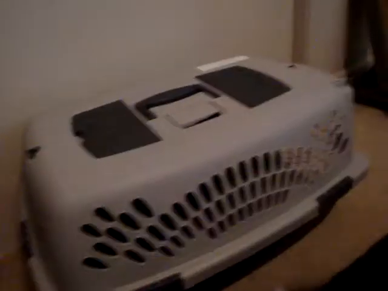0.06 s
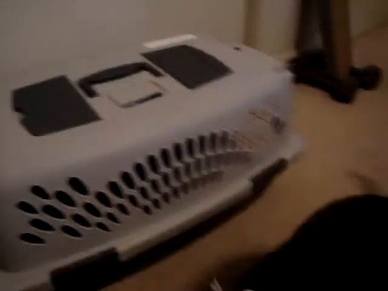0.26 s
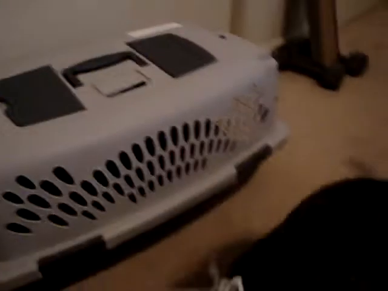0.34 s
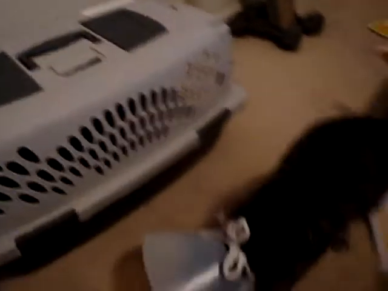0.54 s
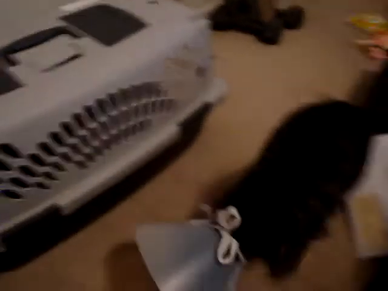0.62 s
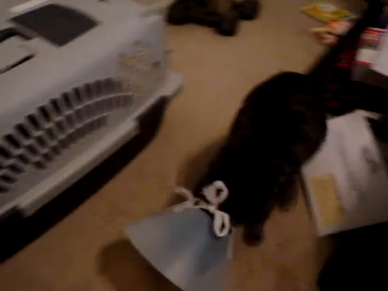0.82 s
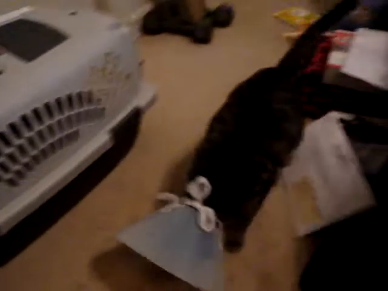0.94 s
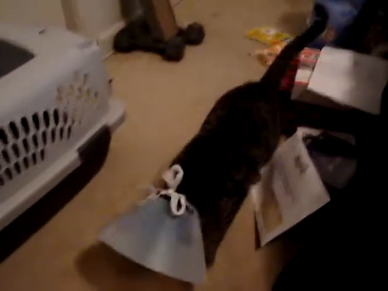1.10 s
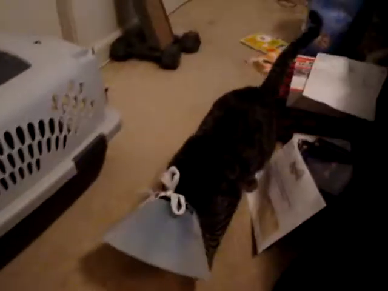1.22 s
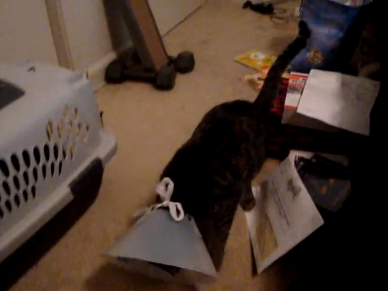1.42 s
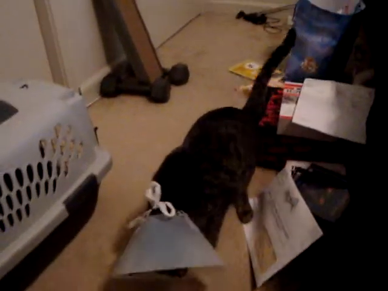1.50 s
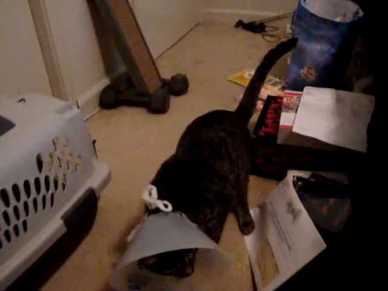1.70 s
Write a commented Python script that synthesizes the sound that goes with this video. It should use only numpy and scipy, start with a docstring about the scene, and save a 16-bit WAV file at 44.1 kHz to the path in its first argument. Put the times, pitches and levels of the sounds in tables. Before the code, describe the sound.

A cat's plastic cone catches and snaps free with one sharp, clattering knock. Soft bumps and scrapes follow, then crisp ticks of paper and a light hollow tap, heard nearby in a quiet room with a faint hum.

```python
"""A cat in a plastic cone walks out of its carrier across the carpet of a quiet room.
A quarter second in, the cone catches and snaps free with one sharp, clattering knock.
Dull bumps of cone and paws follow, with light taps and scrapes. Around one second the cat
brushes past paper in crisp ticks, the rim taps something hollow, and a last soft scrape fades.
Under it all lie the hush of the room and a faint steady hum."""
import sys
import numpy as np
from scipy import signal
from scipy.io import wavfile
from scipy.ndimage import uniform_filter1d

SR = 44100
rng = np.random.default_rng(int(sys.argv[2]) if len(sys.argv) > 2 else 0)


def wav_record(signal):
    """Record a signal, one row per channel, as 16-bit PCM in the file named by sys.argv[1]."""
    frames = np.transpose(np.atleast_2d(signal))
    bounded = np.clip(frames, -1, 1)
    # unit amplitude maps onto the largest positive 16-bit level
    quanta = np.round(bounded * 32767).astype(np.int16)
    wavfile.write(sys.argv[1], SR, quanta)


N = 77175


def snap(ring_db, crack_db, thump_db, thump_hz=278):
    """Stiff plastic catches and snaps free: a bright crack, the ring of the cone and a low push."""
    # The crack's EQ curve. Each row: frequency in Hz, gain in dB.
    crack_eq = [(200, -13), (1000, 0), (3000, -4), (3600, -5), (4800, -1), (6200, -9), (7100, -4),
                (7600, 7), (8200, -7), (8600, 0), (9200, -4), (10000, 3)]
    t = np.arange(6000) / SR
    crack = colour(burst(t, t60=.0095, grit_db=-5), lambda hz: amp(curve(crack_eq, hz)))
    thump = np.sin(2 * np.pi * thump_hz * t) * decay(t, t60=.014)
    return amp(ring_db) * cone_ring(t) + amp(crack_db) * unit_peak(crack) + amp(thump_db) * thump


def cone_ring(t):
    """The struck cone rings briefly in modes of alternating polarity."""
    # The cone's modes. Each row: frequency in Hz, relative level in dB, T60 in seconds.
    modes = [(312, -11, .065), (480, -3, .07), (658, 7, .032), (840, -3, .022), (1004, -13, .028),
             (1125, -6, .011), (1353, -1, .021), (1630, -1, .024), (1925, -8, .021), (2625, -7, .011),
             (2826, -1, .021), (3055, -6, .013), (4153, -9, .012), (5002, -4, .013)]
    return unit_peak(sum((-1) ** k * amp(db) * decay(t, t60) * np.sin(2 * np.pi * hz * t)
                         for k, (hz, db, t60) in enumerate(modes)))


def burst(t, t60, grit_db):
    """A click with a gritty tail of tiny slips."""
    return (t == 0) + amp(grit_db) * rng.choice([-1., 1.], len(t)) * decay(t, t60)


def bump(db, centre_hz, octaves, flutter_db=-28, ring_db=-24.5, soft_hz=3600):
    """A soft blow with a short flutter after it; it barely rings the cone."""
    t = np.arange(6000) / SR
    flutter = amp(flutter_db) * rng.standard_normal(len(t)) * decay(t, t60=.04)
    body = resonance(centre_hz, octaves)
    blow = colour((t == 0) + flutter, lambda hz: body(hz) / (1 + (hz / soft_hz) ** 4))
    return amp(db) * (unit_peak(blow) + amp(ring_db) * cone_ring(t))


def tap(db, soft_hz=3000):
    """A light, cushioned blow of the rim sets something hollow ringing."""
    # The hollow body's modes. Each row: frequency in Hz, relative level in dB, T60 in seconds.
    modes = [(345, -12, .06), (730, -7, .04), (850, 0, .016), (975, -6, .035), (1210, -14, .08),
             (1750, -12, .025)]
    t = np.arange(6000) / SR
    ring = sum(amp(mode_db) * decay(t, t60) * np.cos(2 * np.pi * hz * t) for hz, mode_db, t60 in modes)
    cushioned = colour(ring, lambda hz: 1 / np.sqrt(1 + (hz / soft_hz) ** 2))
    return amp(db) * unit_peak(cushioned)


def tick(db, centre_hz, octaves):
    """Paper or plastic gives a small, dry crackle."""
    crackle = burst(np.arange(3000) / SR, t60=.0155, grit_db=-8.5)
    return amp(db) * unit_peak(colour(crackle, resonance(centre_hz, octaves)))


def scrape(rise, fade, db, centre_hz, octaves, slips_per_s=3500, spread_db=3.8, smooth_share=.35):
    """Dense tiny slips and smooth friction swell and die away in one stroke."""
    t = np.arange(SR) / SR
    slips = (rng.random(SR) < slips_per_s / SR) * rng.choice([-1, 1], SR)
    slips = slips * amp(spread_db * np.minimum(rng.exponential(1, SR), 4))  # a few stick out
    smooth = rng.standard_normal(SR)
    friction = np.sqrt(1 - smooth_share) * unit_rms(slips) + np.sqrt(smooth_share) * smooth
    stroke = np.minimum(t / rise, 1) * amp(-20 * np.maximum(t - rise, 0) / fade)
    return amp(db) * stroke * unit_rms(colour(friction, resonance(centre_hz, octaves)))


def room(x, wet_db=-21.5, dull_hz=2500):
    """Sparse reflections blend into a short, dull tail."""
    # The room's decay. Each row: frequency in Hz, T60 in seconds.
    decay_times = [(150, 0.316), (700, 0.195), (2500, 0.062), (8000, 0.094)]
    reflections = np.zeros(SR // 2)
    slot = 22  # samples; one reflection lands somewhere in each slot
    starts = np.arange(10 * slot, len(reflections) - slot, slot)
    reflections[starts + rng.integers(0, slot, len(starts))] = rng.choice([-1., 1.], len(starts))
    hz, t, bands = signal.stft(reflections, SR, nperseg=256)
    tail = signal.istft(bands * decay(t, curve(decay_times, hz)[:, None]), SR, nperseg=256)[1]
    tail = colour(tail / np.linalg.norm(tail), lambda f: 1 / (1 + (f / dull_hz) ** 2))
    return amp(wet_db) * signal.fftconvolve(x, tail)[:N]


def hush(db=-52.5, patch_db=.9636):
    """Room tone: soft air noise with faint drifting patches."""
    # The air's EQ curve. Each row: frequency in Hz, gain in dB.
    air_eq = [(30, -26), (75, -18), (112, -2), (175, -10), (290, -1.5), (430, -1.5), (700, -4),
              (1100, -6.2), (1700, -7.2), (2800, -11), (4200, -14.5), (6500, -17.3), (9600, -20)]
    hz = np.fft.rfftfreq(1024, 1 / SR)
    real, imag, patches = rng.standard_normal((N // 256 + 5, len(hz), 3)).T
    patches = uniform_filter1d(patches, size=12, axis=0)  # smooth across frequency
    patches = unit_rms(uniform_filter1d(patches, size=14, axis=1))  # then across time
    bands = (real + 1j * imag) * amp(curve(air_eq, hz)[:, None] + patch_db * patches)
    return amp(db) * unit_rms(signal.istft(bands, nperseg=1024, noverlap=768)[1][:N])


def hum(waver_s=.08):
    """Faint tones of even level and slightly wavering pitch, as of a fan."""
    # The hum's tones. Each row: frequency in Hz, level in dB, RMS pitch waver in Hz.
    tones = [(114.22, -70.5, 1.98), (519.3, -61.5, 1.51), (816.9, -68, 2.008)]
    window = np.hanning(round(waver_s * SR))[None]
    drifts = signal.fftconvolve(rng.standard_normal((len(tones), N)), window, "same", axes=1)
    return sum(amp(db) * unit_rms(np.sin(2 * np.pi * np.cumsum(hz + waver * unit_rms(drift)) / SR))
               for (hz, db, waver), drift in zip(tones, drifts))


def amp(db):
    """Decibels to gain."""
    return 10 ** (np.asarray(db) / 20)


def unit_rms(x):
    """Normalises to an RMS of one."""
    return x / np.sqrt(np.mean(x ** 2) + 1e-20)


def unit_peak(x):
    """Normalises to a peak of one."""
    return x / abs(x).max()


def decay(t, t60):
    """An exponential fade, 60 dB down after t60 seconds."""
    return np.exp(-np.log(1000) * t / t60)


def curve(points, hz):
    """Interpolates breakpoints on a log-frequency axis."""
    point_hz, values = np.transpose(points)
    return np.interp(np.log(hz + 1), np.log(point_hz + 1), values)


def resonance(centre_hz, octaves):
    """A bell-shaped gain over frequency."""
    return lambda hz: 1 / (1 + (np.log2((hz + 1) / centre_hz) / octaves) ** 2 / 2) ** 2


def colour(x, gain, size=4096):
    """Minimum-phase EQ following gain(hz), so nothing rings ahead of an attack."""
    hz = abs(np.fft.fftfreq(size, 1 / SR))
    log_gain = np.log(np.maximum(gain(hz), 1e-5))
    impulse = np.fft.ifft(np.exp(np.conj(signal.hilbert(log_gain)))).real
    return signal.fftconvolve(x, impulse[:size // 2])[:len(x)]


def scene(low_cut_hz=119.5):
    """The cat's knocks and scrapes over the room tone; light plastic gives off little bass."""
    # The cluster of snaps that makes the knock.
    # Each row: start in seconds, then the levels of ring, crack and thump in dB.
    snaps = [(.24628, -30, -6, -27), (.24704, -27, -6.5, -22), (.24953, -24, -7, -22.5),
             (.25157, -24, -13, -36), (.25308, -15, -7, -42), (.25414, -13, -16, -29),
             (.25503, -14.5, -13, -31)]
    # Dull bumps of cone and paws.
    # Each row: start in seconds, level in dB, centre in Hz, width in octaves.
    bumps = [(.2567, -18, 1500, .9), (.2625, -35, 2000, 1.0), (.2667, -30, 1900, 1.2),
             (.2725, -23.5, 1700, 1.0), (.2746, -27, 560, .9), (.2807, -23, 1200, 1.1),
             (.2853, -24.5, 780, 1.0), (.378, -37, 270, 1.1), (.4235, -36.5, 290, .65),
             (.425, -36.5, 1200, 1.1), (.4622, -33, 1400, 1.076), (.466, -36.5, 350, .8),
             (.5735, -31, 900, 1.4)]
    # Hollow taps of the cone's rim. Each row: start in seconds, level in dB.
    taps = [(.2809, -26.5), (.2858, -34), (.4619, -36), (1.1104, -26.5)]
    # Crisp ticks of paper and plastic.
    # Each row: start in seconds, level in dB, centre in Hz, width in octaves.
    ticks = [(.2695, -38, 7500, .4), (.4455, -27.5, 4600, .45), (.446, -35, 1100, 1.0),
             (.9073, -31, 3100, .775), (.9195, -35.5, 3000, 1.09), (.9935, -33, 3000, 1.94),
             (1.0015, -36, 2200, 1.16), (1.0040, -28.5, 1800, 1.7), (1.0170, -33, 3000, 1.12),
             (1.0195, -29.5, 2700, 1.4), (1.0435, -38, 2500, 1.7), (1.052, -38, 1600, 0.45)]
    # Scrapes, rubs and rattles. Each row: start, rise and fade to -20 dB, all in seconds,
    # then level in dB, centre in Hz, width in octaves.
    scrapes = [(.258, .016, .014, -42, 1200, 1.1), (.454, .008, .10, -45.5, 8300, .22),
               (.468, .028, .035, -42.5, 8420, .26), (.47, .028, .04, -49.5, 5600, .35),
               (.459, .005, .06, -48.5, 800, 1.2), (.42, .0496, .4319, -52, 3900, 1.28),
               (.51, .055, .55, -52, 1120, 1.15), (.90, .0243, .09, -50.5, 2770, 1.255),
               (.965, .0483, .0338, -42.5, 1374, 1.67), (1.02, .025, .125, -46.5, 1600, 1.5),
               (.98, .091, .0573, -53, 8200, .76), (1.40, .0397, .04, -52, 2000, .75),
               (.365, .01, .25, -60, 8000, .5)]
    cat = np.zeros(N)
    for cues, source in ((snaps, snap), (bumps, bump), (taps, tap), (ticks, tick), (scrapes, scrape)):
        for start, *settings in cues:
            at = round(start * SR)
            sound = source(*settings)[:N - at]
            cat[at:at + len(sound)] += sound
    cat = signal.sosfilt(signal.butter(2, low_cut_hz, "high", fs=SR, output="sos"), cat)
    return (cat + room(cat) + hush() + hum())[None]


def record(dry, edge_hz=10130):
    """A steep low-pass takes off the top octave."""
    low_pass = signal.firwin(511, edge_hz, window=("kaiser", 7), fs=SR)
    return signal.oaconvolve(dry, low_pass[None], "same")


dry = scene()
out = record(dry)
wav_record(out)
```